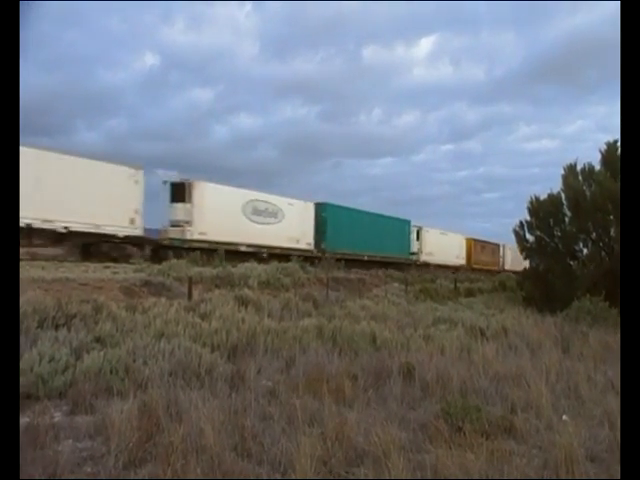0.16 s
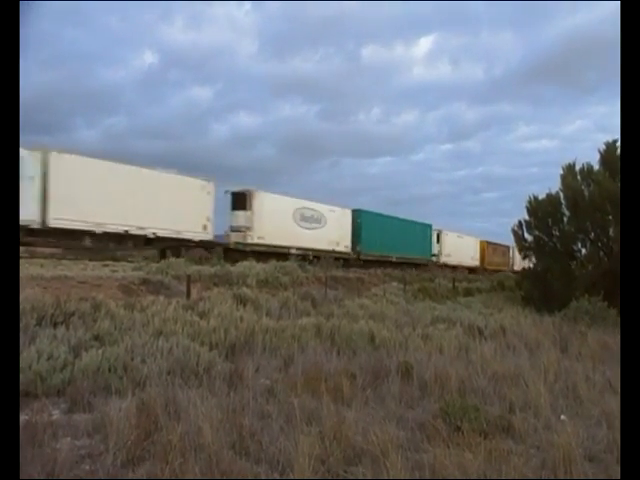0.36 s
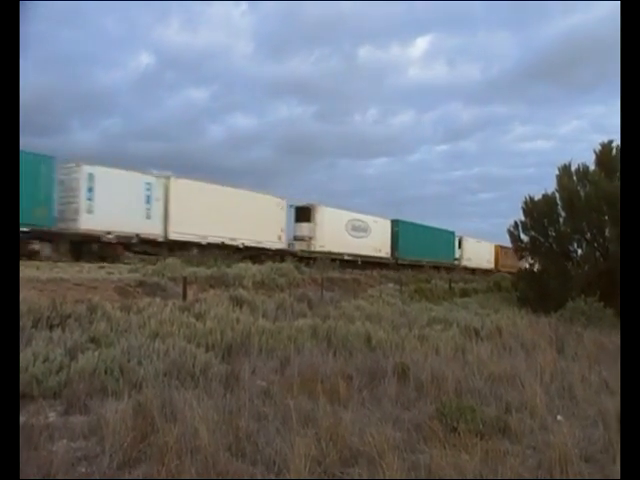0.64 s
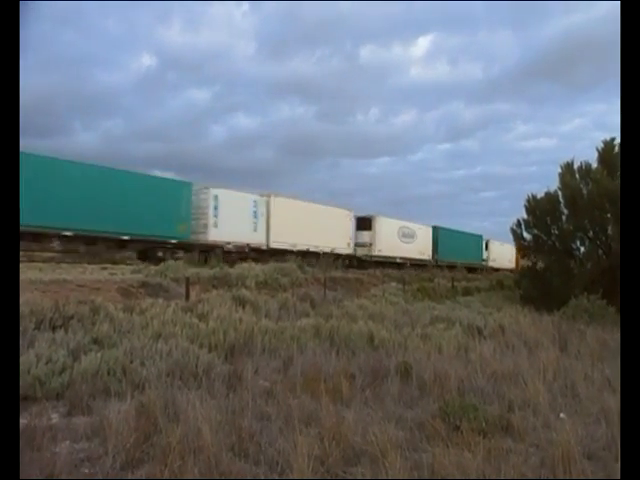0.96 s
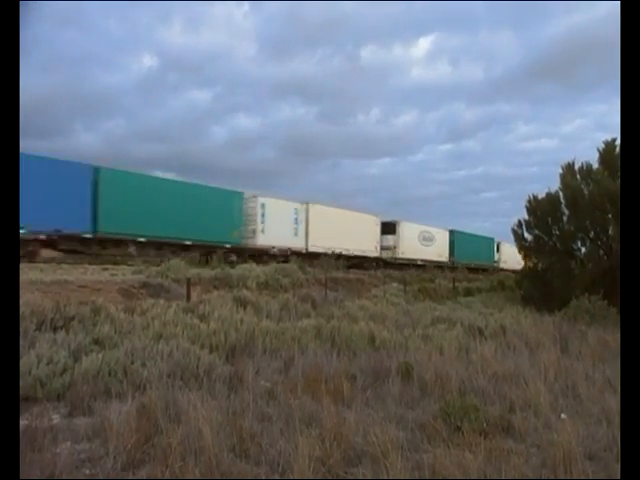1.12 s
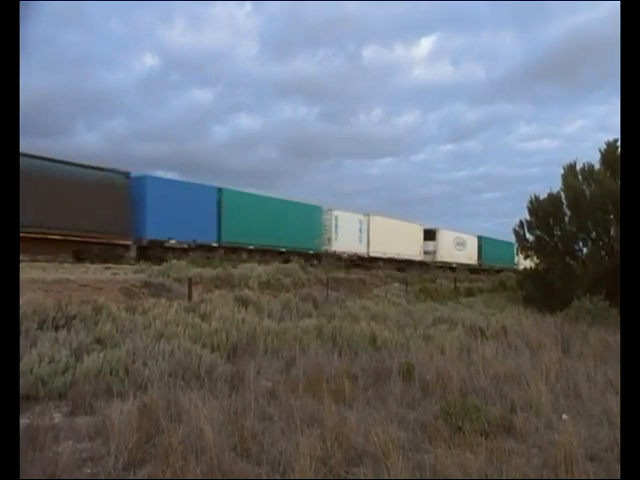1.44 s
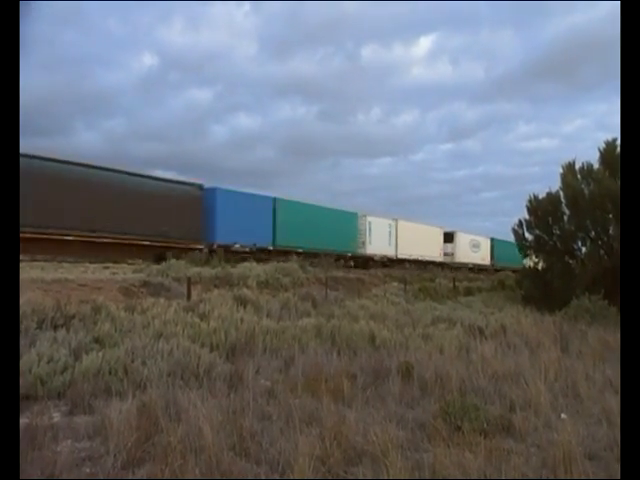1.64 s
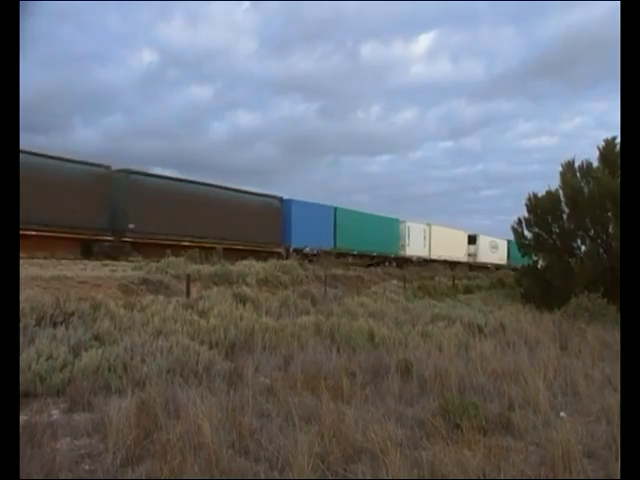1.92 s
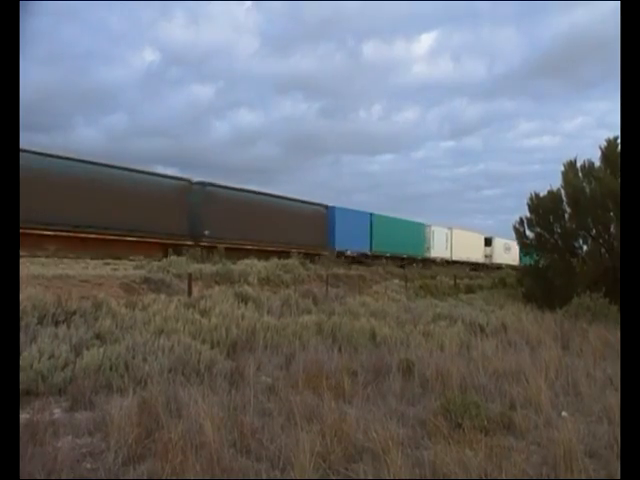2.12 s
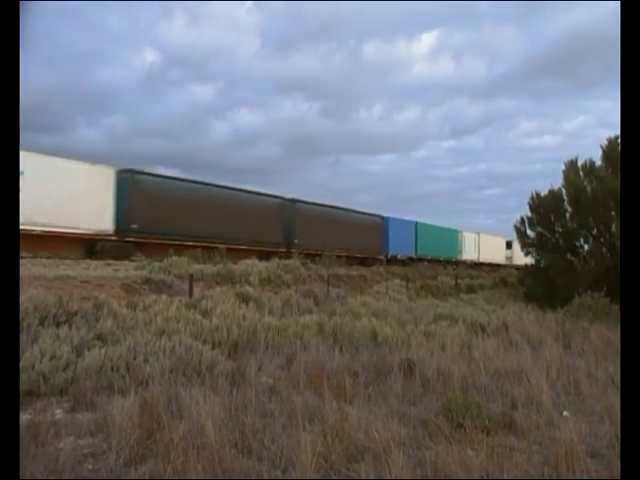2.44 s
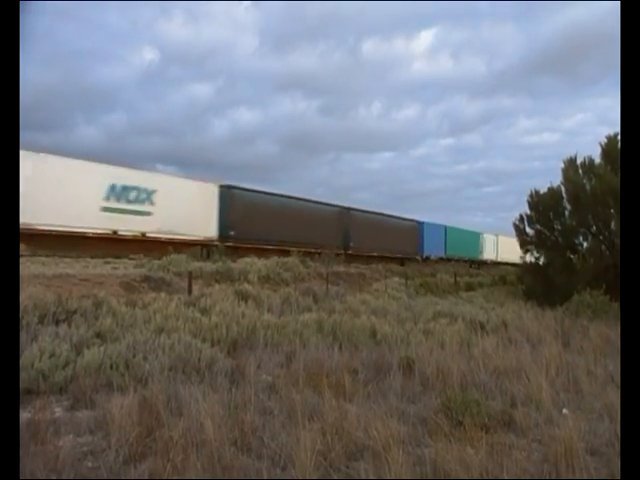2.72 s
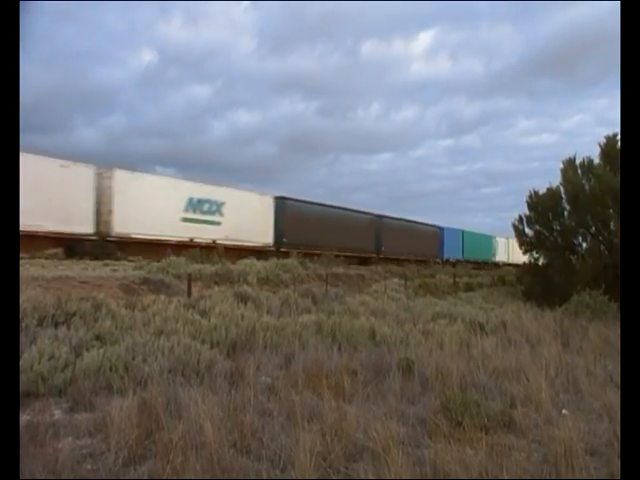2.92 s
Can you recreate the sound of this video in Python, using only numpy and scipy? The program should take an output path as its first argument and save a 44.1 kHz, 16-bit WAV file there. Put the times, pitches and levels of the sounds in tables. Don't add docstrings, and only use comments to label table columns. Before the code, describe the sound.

A long freight train rolls past with deep rumble, steel roar and clacking wheels

```python
import sys
import numpy as np
from scipy import signal
from scipy.io import wavfile
from scipy.ndimage import uniform_filter1d

SR = 44100
rng = np.random.default_rng(int(sys.argv[2]) if len(sys.argv) > 2 else 0)


def natural_amplitude(level_db):
    exponent = np.asarray(level_db, float) / 20
    return 10 ** exponent


def persist_wave(psi):
    counts = np.round(np.clip(psi, -1, 1) * 32767).astype(np.int16)
    wavfile.write(sys.argv[1], SR, np.atleast_2d(counts).T)


N = 135387


def evened(x):
    return x / np.sqrt(np.mean(abs(x) ** 2) + 1e-20)


def smooth_twice(x, width, axis=-1):
    return uniform_filter1d(uniform_filter1d(x, width, axis), width, axis)


def read(points, hz):
    f, value = np.transpose(points)
    return np.interp(np.log(hz + 1), np.log(f + 1), value)


# f/Hz, likeness (0 to 1)
SAME = [(40, 1), (140, 0.99), (340, 1), (810, 0.95), (1940, 0.63), (4640, 0.35), (6300, 0.38)]
# f/Hz, lead/rad
LEAD = [(60, 0.012), (1460, 0.49), (3620, 1.23), (4650, 1.42), (6100, 3.5)]
# f/Hz, level/dB
TILT = [(60, -0.9), (140, -0.4), (340, -0.5), (810, 0.0), (1940, 1), (4640, -0.3), (11100, -6)]


def ports(z1, z2, hz):
    bass_same = .9992
    same = np.where(hz < 100, bass_same, np.clip(read(SAME, hz), 0, 1))[:, None]
    turn = (np.exp(.5j * read(LEAD, hz)) * natural_amplitude(read(TILT, hz) / 2))[:, None]
    left = z1 * turn
    right = (same * z1 + np.sqrt(1 - same ** 2) * z2) / turn
    return np.array([left, right])


def at_microphones(x):
    hz, _, z = signal.stft(x, SR, nperseg=1024)
    return signal.istft(ports(z, z * 1j, hz), SR, nperseg=1024)[1][:, :N]


def noise(shape_db, patchy_db, patch_hz, patch_s, flicker_db, size=1024):
    hop = size // 4
    frames, hz = N // hop + 5, np.fft.rfftfreq(size, 1 / SR)
    a, b, c, d, patches = rng.standard_normal((frames, len(hz), 5)).T
    patches = uniform_filter1d(patches, int(patch_hz * size / SR) + 1, 0)
    patches = evened(uniform_filter1d(patches, int(patch_s * SR / hop) + 1, 1))
    flicker = evened(uniform_filter1d(rng.standard_normal(frames), 3))
    level_db = shape_db(hz)[:, None] + patchy_db * patches + flicker_db * flicker
    z = ports(a + 1j * b, c + 1j * d, hz) * natural_amplitude(level_db)
    return evened(signal.istft(z, nperseg=size, noverlap=size - hop)[1][:, :N])


def follow(curve, share=1):
    s, db = np.transpose(curve)
    return natural_amplitude(db.mean() + share * (np.interp(np.arange(N) / SR, s, db) - db.mean()))


def bump(start, length, rise):
    at = np.arange(max(round(start * SR), 0), min(round((start + length) * SR), N))
    u = np.clip((at / SR - start) / length, 0, 1)
    u = u ** (np.log(.5) / np.log(np.clip(rise, .05, .95)))
    return at, np.sin(np.pi * u) ** 2


# t/s, level/dB
ROLLING = [(0, -28), (.16, -23.5), (.25, -28.5), (.33, -24.5), (.44, -30.5), (.7, -24.5), (.79, -28),
           (.92, -24.5), (1.27, -27.5), (1.35, -29), (1.46, -23), (1.7, -27.5), (1.79, -25.5), (2.3, -28.5),
           (2.38, -32), (2.85, -30.5), (2.94, -33), (3.07, -29)]
# f/Hz, level/dB per Hz
RUMBLE = [(26, -15), (45, -7.5), (105, -4.5), (150, -12.5), (200, -15), (250, -22.5), (400, -31),
          (520, -38.5), (880, -120)]
# t/s, level/dB
HEAVE = [
    (0, -17),
    (.5, -15),
    (1, -12.5),
    (1.5, -15),
    (2, -11),
    (2.5, -7),
    (3.07, -13.5),
]
# f/Hz, level/dB per Hz
SUB = [(4.7, -32), (8.0, -5), (25, 0.5), (40, 5.5), (90, -7.5), (120, -16.5), (200, -120)]


def rumble():
    drone = noise(lambda hz: read(RUMBLE, hz), 1.55, 50, .05, 0.44, size=2048)
    heave = noise(lambda hz: read(SUB, hz), 0.72, 20, .1, 0.94, size=8192)
    drone_gain = natural_amplitude(-16) * follow(ROLLING, 0.49) / natural_amplitude(np.mean(ROLLING, 0)[1])
    return drone * drone_gain + heave * follow(HEAVE, 0.6)


# f/Hz, level/dB per Hz
ROAR = [(150, -28), (250, -7), (488, -4.5), (890, -3.5), (1310, -7), (1960, -5.5), (2390, -11),
        (3570, -12.5), (6100, -21), (7930, -54), (13400, -120)]
# f/Hz, width/Hz, level/dB (negative lowers)
RAIL = [
    (720, 36, 2.5),
    (900, 52, -1),
    (2013, 30, 1),
    (2640, 90, 3.5),
    (3640, 110, 2),
]


def roar_db(hz):
    lift_db = sum(db / (1 + ((hz - f) / width) ** 2) for f, width, db in RAIL)
    return read(ROAR, hz) + lift_db


# f/Hz, level/dB per Hz
FIZZ = [(3800, -46.5), (6400, 1), (8160, 0), (9500, -6.5), (11000, -7.5), (13600, -10), (16000, -58.5)]


def rolling():
    fizz_db = -40.5
    roar = noise(roar_db, 1.34, 200, .03, 0.92, size=512) * follow(ROLLING, 0.86) * natural_amplitude(4.5)
    fizz = noise(lambda hz: read(FIZZ, hz), 1.6, 600, 0.066, 0.73, size=512)
    return roar + fizz * follow(ROLLING, 0.8) * natural_amplitude(fizz_db - np.mean(ROLLING, 0)[1])


# t/s, f/Hz, level/dB
HUM = [(0, 900, -33.5), (.3, 890, -30), (.45, 890, -40.5), (.75, 900, -35.5), (.9, 850, -28),
       (1.032, 900, -31.5), (1.15, 911, -38), (1.4, 875, -32.5), (1.57, 890, -34.5), (1.681, 883, -37),
       (1.79, 868, -30), (1.85, 738.7, -29), (2.07, 720, -29), (2.201, 709, -41), (2.31, 685, -32.5),
       (2.45, 675, -44), (3.07, 660, -41.5)]


def hum():
    s, hz, db = np.transpose(HUM)
    t = np.arange(N) / SR
    a, b = smooth_twice(rng.standard_normal((2, N)), 230)
    turns = np.cumsum(np.interp(t, s, hz)) / SR
    return natural_amplitude(np.interp(t, s, db)) * evened(((a + 1j * b) * np.exp(2j * np.pi * turns)).real)


def struck(tones):
    out = np.zeros(N)
    a, b = [evened(smooth_twice(v, 300)) for v in rng.standard_normal((2, N))]
    for start, length, hz, db in tones:
        at, swell = bump(start - 0.12 * length, 1.337 * length, 0.4)
        rough = 0.42 * np.clip(hz / 600, .2, 1) * (a[at] + 1j * b[at])
        tone = (1 + rough) * np.exp(2j * np.pi * hz * (at / SR - start))
        out[at] += natural_amplitude(db + 2.5) * swell ** 0.76 * tone.real
    return out


# t/s (middle), level/dB, length/s, f/Hz
THUDS = [(0.111, -18.5, 0.1, 96), (0.218, -3.5, 0.037, 51.8), (0.35, -13.7, 0.034, 105),
         (0.376, -12.9, 0.1, 63.8), (0.419, -5, 0.044, 52.2), (0.535, -13.5, 0.097, 47.4),
         (0.619, -9.5, 0.055, 84), (0.694, -9, 0.049, 38), (0.761, -15, 0.04, 55.4),
         (0.888, -21.5, 0.078, 141.4), (0.946, -8.5, 0.038, 101), (0.989, -12.5, 0.1, 92.8),
         (1.063, -7.5, 0.053, 78.4), (1.08, -21, 0.082, 151.6), (1.253, -13, 0.1, 74),
         (1.27, -19, 0.062, 180.2), (1.276, -12, 0.066, 40), (1.332, -10.5, 0.061, 67),
         (1.515, -11, 0.065, 31), (1.534, -20.5, 0.11, 145), (1.543, -14, 0.07, 64.5),
         (1.584, -19, 0.042, 142), (1.689, -10, 0.0743, 43.9), (1.691, -13, 0.1, 87.8),
         (1.791, -10, 0.0465, 100.2), (1.906, -5.5, 0.056, 27.5), (1.948, -19, 0.038, 178),
         (2.001, -8.5, 0.032, 27), (2.071, -15, 0.029, 27.2), (2.115, -11.5, 0.035, 27),
         (2.229, -3, 0.0486, 32), (2.261, -15, 0.04, 76.6), (2.34, -9.5, 0.042, 54),
         (2.404, -17, 0.062, 86), (2.488, -8, 0.039, 27), (2.563, -10.5, 0.1, 37.2),
         (2.6, -8.5, 0.087, 37.6), (2.614, -11, 0.04, 75), (2.702, -8.5, 0.087, 38),
         (2.788, -8.5, 0.035, 27.3), (2.834, -14, 0.041, 26.3), (2.864, -13, 0.1, 64.3),
         (2.891, -9, 0.048, 75.5), (2.999, -11.9, 0.042, 27.1), (3.029, -14.5, 0.1, 104.7),
         (3.053, -7, 0.06, 28)]


def thuds():
    return struck([(s - .5 * length, length, hz, db) for s, db, length, hz in THUDS])


# t/s (start), length/s, f/Hz, level/dB
RINGS = [(0.197, 0.02, 1093, -19), (0.28, 0.061, 1800, -31), (.625, 0.026, 1880, -28),
         (.655, 0.024, 1950, -31), (0.31, 0.021, 1150, -26.5), (.81, 0.067, 2640, -29),
         (.14, 0.06, 3650, -39.5), (1.153, 0.032, 2200, -35), (1.455, 0.077, 3540, -31.5),
         (1.49, 0.04, 650, -26), (1.76, 0.041, 720, -27), (2.23, 0.042, 6430, -40.5),
         (0.868, 0.049, 890, -29.5)]


def rings():
    return struck(RINGS)


# t/s, level/dB, length/s, brightness (-0.8 or less all dull, 3.2 or more all bright)
CLACKS = [(0.168, -22.5, 0.087, 1.5), (0.296, -26, 0.049, -16), (0.66, -21, 0.032, -0.3),
          (0.74, -24.5, 0.041, -0.5), (0.927, -25.5, 0.058, -1.5), (1.545, -15.5, 0.027, 0.6),
          (1.496, -22.5, 0.08, 1.5), (1.651, -21.5, 0.023, -0.5), (1.782, -21.5, 0.026, -5),
          (1.944, -23, 0.022, 27), (2.06, -25, 0.024, 4), (2.18, -27, 0.023, 2), (2.465, -30, 0.047, -1.8),
          (2.887, -25.5, 0.047, 0.4), (3.017, -28.5, 0.023, -24)]


def clack_db(hz):
    return np.maximum(roar_db(hz), read(FIZZ, hz) - 22) - 9 * np.log2(np.clip(hz / 4000, 1, 2))


def clacks():
    out = np.zeros((2, N))
    dull = noise(lambda hz: clack_db(hz) + 6 * np.log2(np.clip(hz / 1200, .01, 1)),
                 1.0, 300, 0.025, .2, size=256)
    bright = noise(lambda hz: clack_db(hz) + 12 * np.log2(np.clip(hz / 3500, .01, 1)),
                   0.4, 300, 0.031, .2, size=256)
    for s, db, length, brightness in CLACKS:
        mix = np.clip(0.2 + brightness / 4, 0, 1)
        at, swell = bump(s - 0.88 * length, 2 * length, 0.56)
        out[:, at] += natural_amplitude(db) * swell * ((1 - mix) * dull[:, at] + mix * bright[:, at])
    return out


def scene():
    return rumble() + rolling() + at_microphones(hum() + thuds() + rings()) + clacks()


def random_blocks(hz, t, bins, frames):
    return rng.standard_normal((len(t) // frames + 1, len(hz) // bins + 1)).T


def spread(blocks, hz, t, bins, frames):
    return np.repeat(np.repeat(blocks, bins, 0), frames, 1)[:len(hz), :len(t)]


# t/s, level/dB
OPENNESS = [(0, 6.5), (.17, -3), (.24, -3), (.3, -7), (.5, 1), (.9, 1), (1.1, 9), (1.28, 6), (1.36, -6.5),
            (1.46, 5), (1.57, -6), (1.7, 3), (1.88, -1), (2.15, 4), (2.33, -1.5), (2.41, -10), (2.47, 4),
            (3.07, 1.5)]
# f/Hz, level/dB
TREBLE_FLOOR = [(5000, -22), (8500, -16.5), (9500, -5.5), (10500, 0.5), (11300, 10), (12000, 25),
                (13600, 24)]
# t/s, f/Hz
SURVIVORS = [(.29, 9650), (.3, 10250), (.32, 9950), (.335, 10300), (.345, 9700), (.38, 10900), (.47, 11350),
             (.585, 11800), (.97, 12000), (.985, 13050), (1.075, 12400), (1.1, 12250), (1.105, 13350),
             (1.17, 12500), (1.18, 13300), (1.25, 11850), (1.41, 12100), (1.43, 11700), (1.54, 12100),
             (1.55, 11650), (1.63, 12300), (1.65, 11800), (1.745, 11500), (1.92, 11150), (1.93, 12900),
             (2.115, 12700), (2.28, 11520), (2.435, 13000), (2.475, 11840)]


def share_treble(x):
    fold_hz, fold_mid_hz, fold_span_hz, edge_hz = 6290, 8700, 1740, 13600
    jump_size_db, jump_share = 7.5, .4
    hz, t, z = signal.stft(x, SR, window="cosine", nperseg=1024, noverlap=768)
    treble = z[1]
    blocks = random_blocks(hz, t, 8, 6)
    blocks = evened(uniform_filter1d(blocks, 3, 0)) + 0.5 * blocks[0]
    blocks = spread(blocks, hz, t, 8, 6)
    off_middle = ((hz[:, None] - fold_mid_hz) / fold_span_hz) ** 2
    jump_db = jump_size_db * np.clip(3 * (blocks + jump_share - off_middle), 0, 1)
    power = uniform_filter1d(uniform_filter1d(abs(treble) ** 2, 2, 0), 9, 1)
    power = power / uniform_filter1d(power[(hz > fold_hz) & (hz < fold_mid_hz)].mean(0), 9)
    usual = uniform_filter1d(power.mean(1), 20)[:, None]
    luck_db = 5.2 * spread(random_blocks(hz, t, 3, 9), hz, t, 3, 9)
    openness_db = np.interp(t, *np.transpose(OPENNESS)) - np.mean(OPENNESS, 0)[1]
    over_db = 10 * np.log10(power / usual + 1e-12) - read(TREBLE_FLOOR, hz)[:, None]
    over_db = over_db + 1.8 * openness_db + luck_db
    for s, f in SURVIVORS:
        over_db[np.ix_(abs(hz - f) < 70, abs(t - s) < .026)] = 1
    mono = treble * np.clip(over_db / 0.53, 0, 1) * natural_amplitude(np.array([-jump_db, jump_db]) / 2)
    z = np.where((hz > fold_hz)[:, None], mono, z) * (hz < edge_hz)[:, None]
    return signal.istft(z, SR, window="cosine", nperseg=1024, noverlap=768)[1][:, :N]


def limiter(x):
    limit_db, squeeze, recover_db_s, ceiling = -5, .28, 400, 1.005
    power_db = 10 * np.log10(uniform_filter1d((x ** 2).mean(0), 300) + 1e-9)
    fall = np.arange(N) * recover_db_s / SR
    held_db = np.maximum.accumulate(power_db + fall) - fall
    over_db = np.maximum(held_db - limit_db, 0)
    return np.clip(x / natural_amplitude(squeeze * uniform_filter1d(over_db, 300)), -ceiling, ceiling)


def low_pass(x):
    return signal.sosfilt(signal.butter(12, 21000, fs=SR, output="sos"), x)


def record(dry):
    mix = np.clip(share_treble(limiter(dry)), -1, 1)
    return low_pass(mix)


dry = scene()
out = record(dry)
persist_wave(out)
```